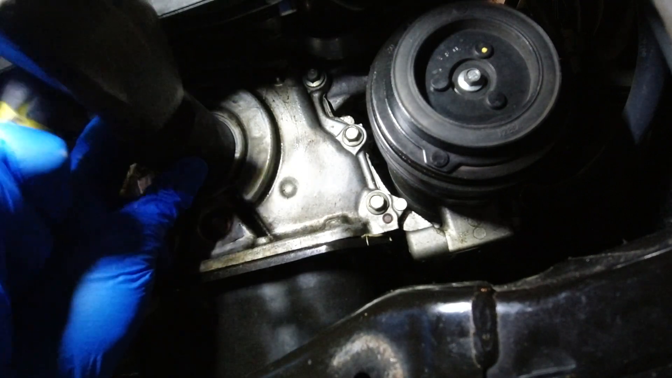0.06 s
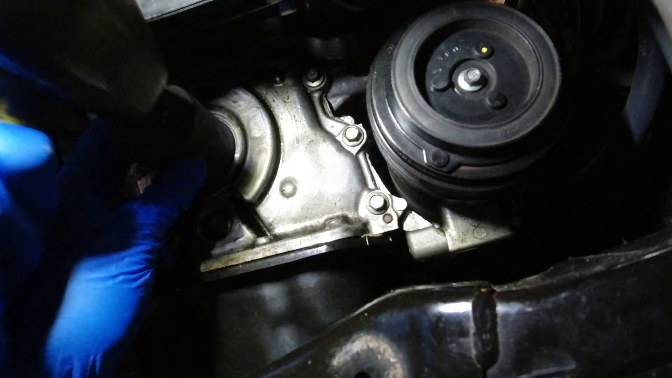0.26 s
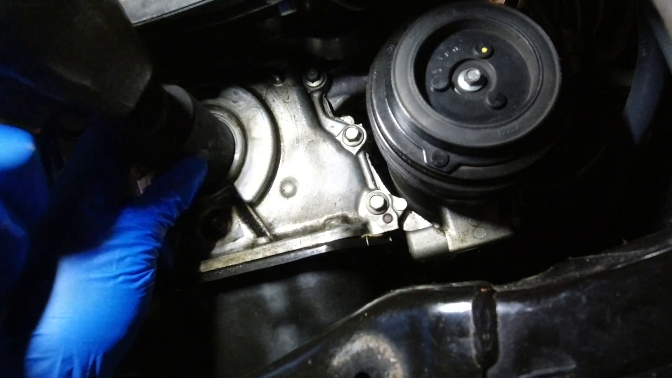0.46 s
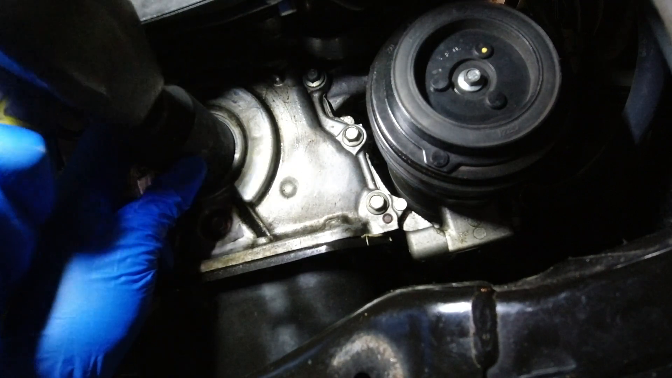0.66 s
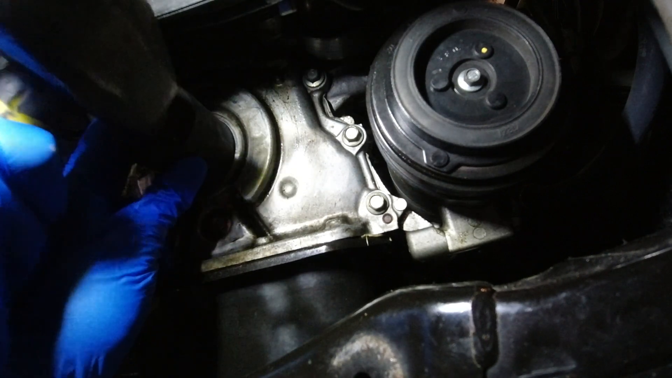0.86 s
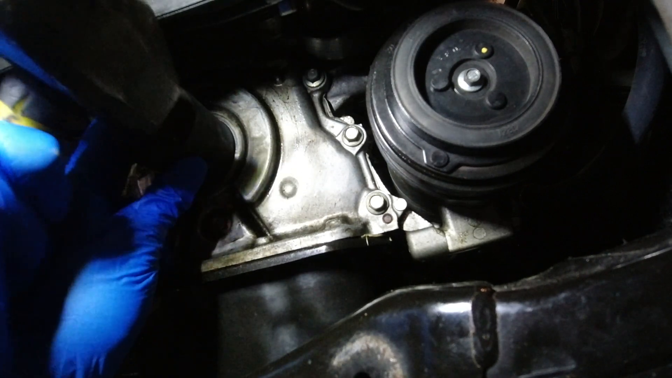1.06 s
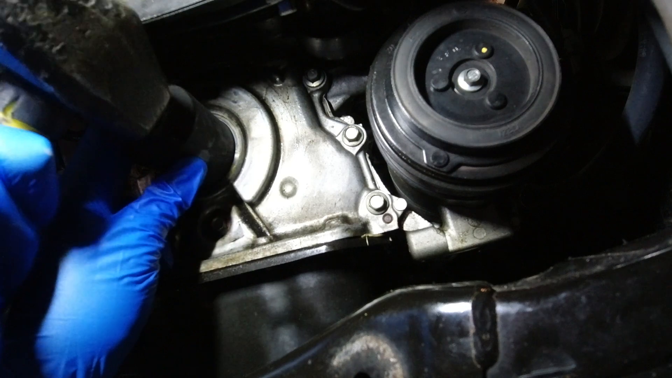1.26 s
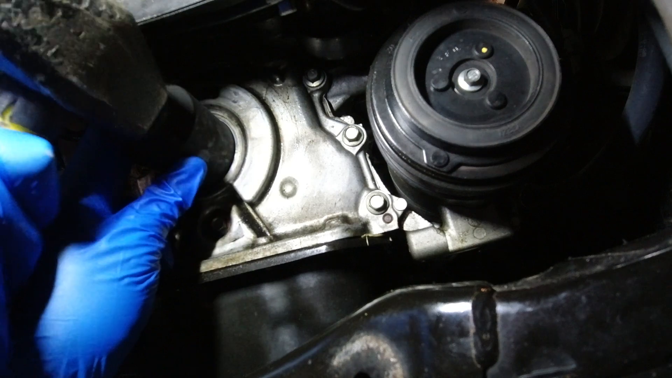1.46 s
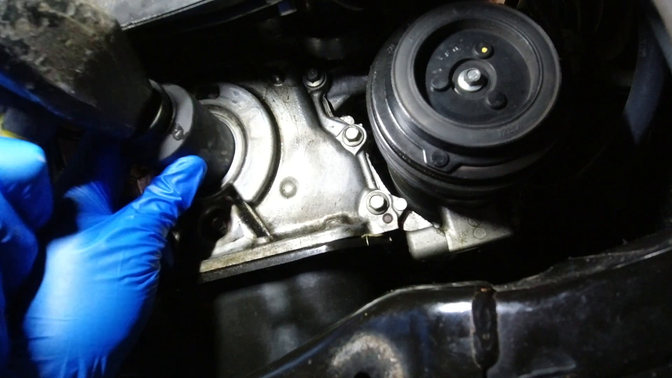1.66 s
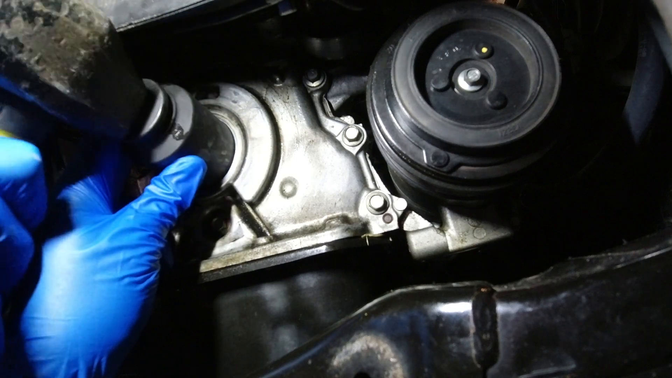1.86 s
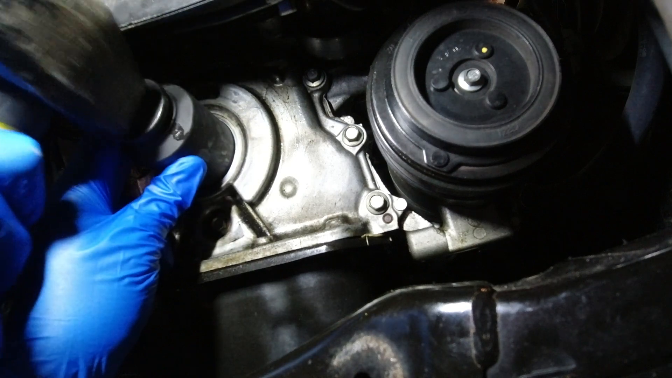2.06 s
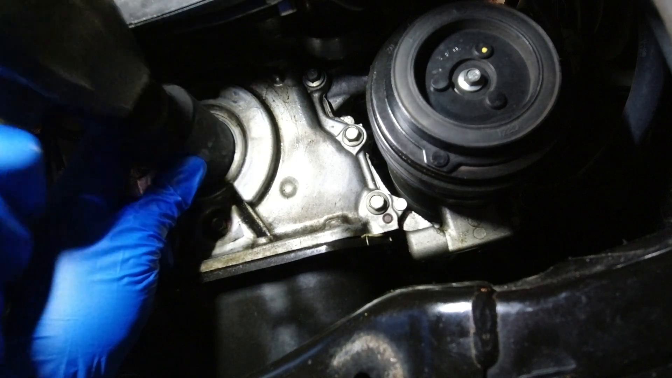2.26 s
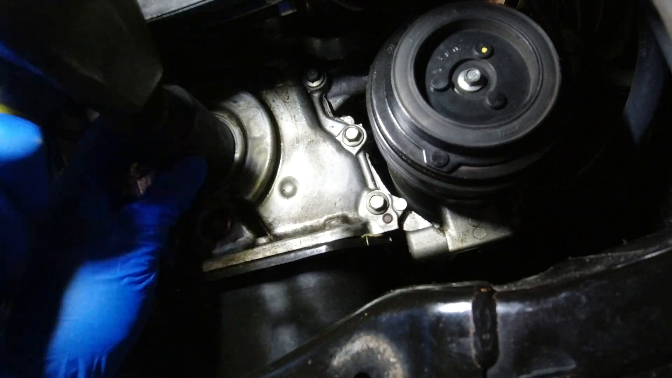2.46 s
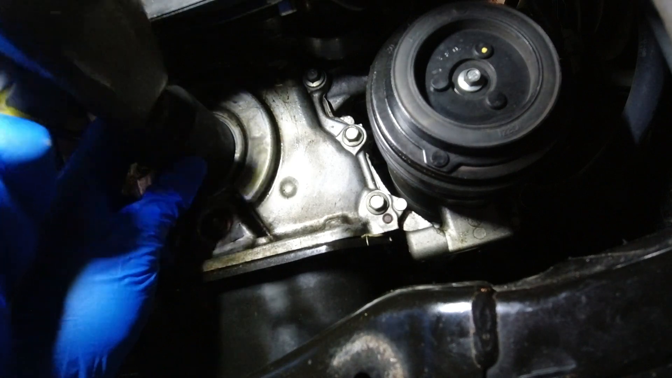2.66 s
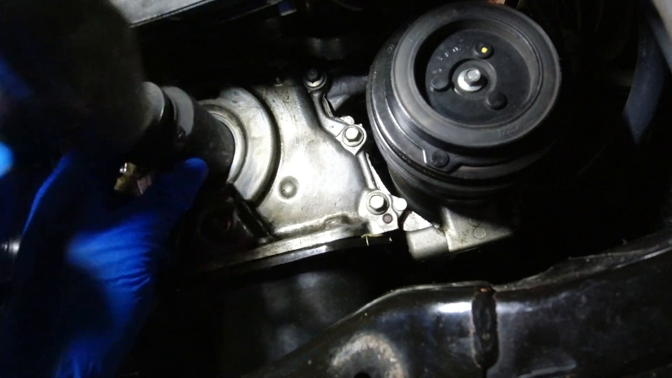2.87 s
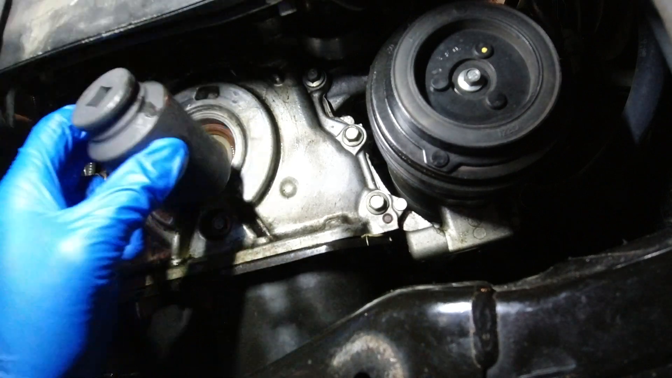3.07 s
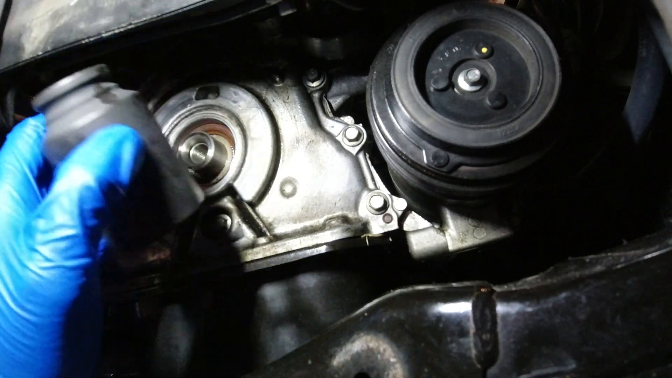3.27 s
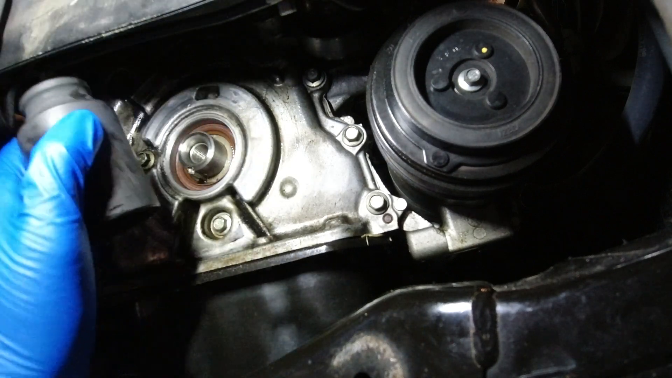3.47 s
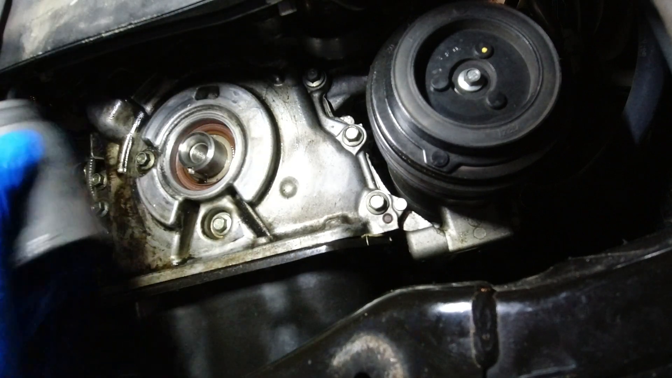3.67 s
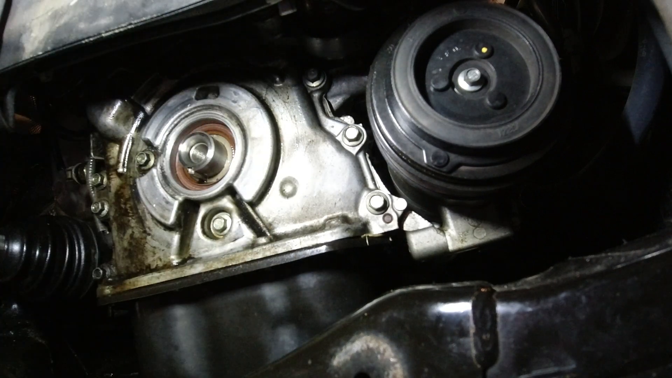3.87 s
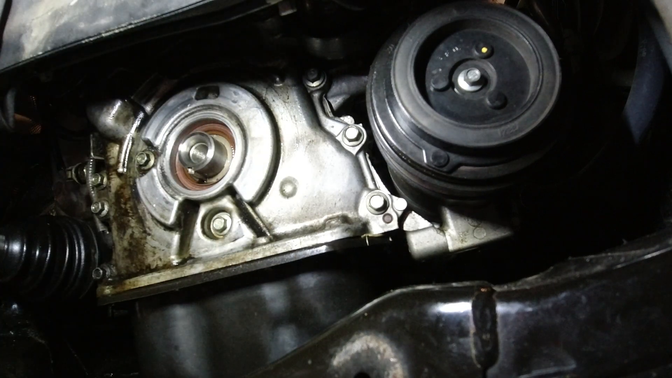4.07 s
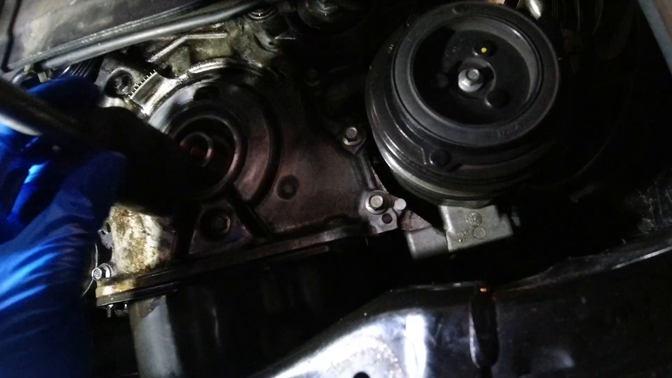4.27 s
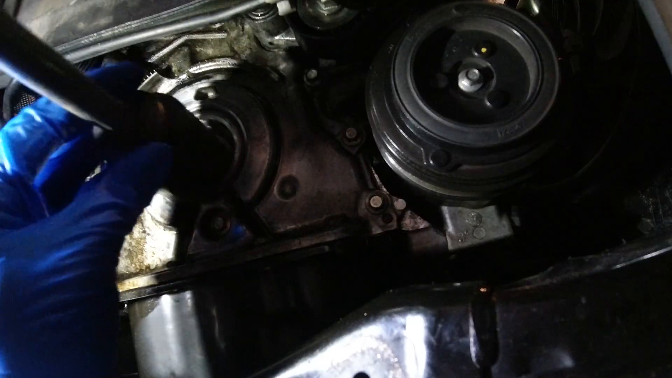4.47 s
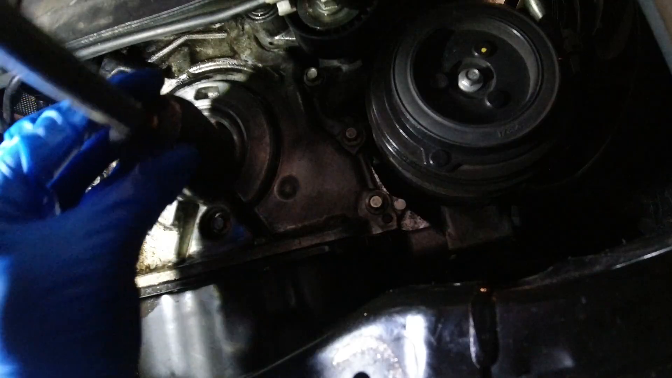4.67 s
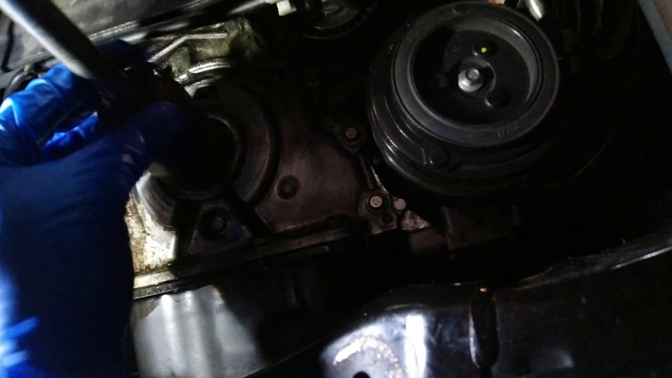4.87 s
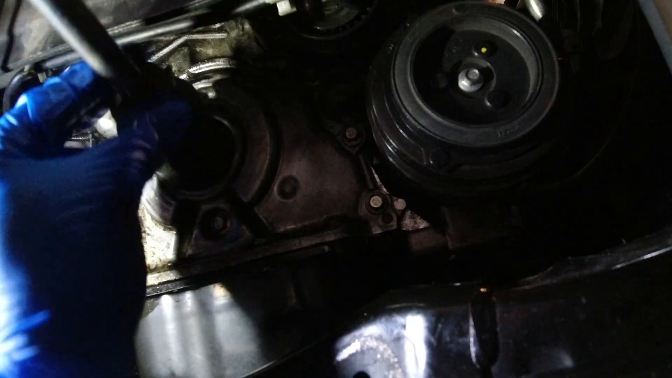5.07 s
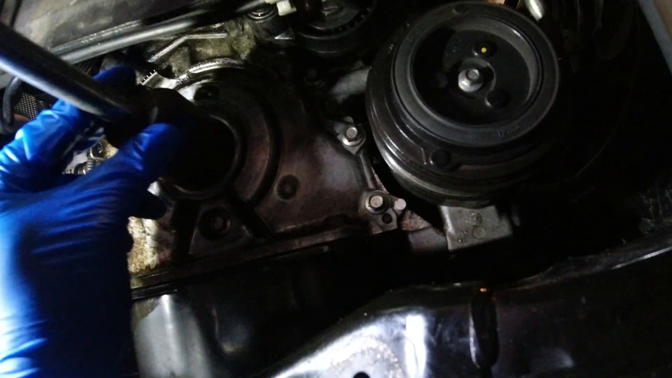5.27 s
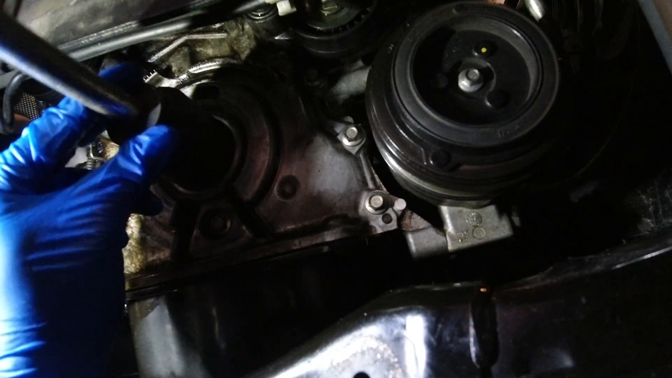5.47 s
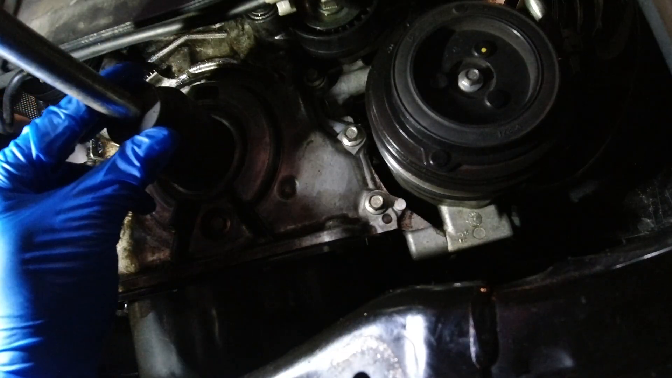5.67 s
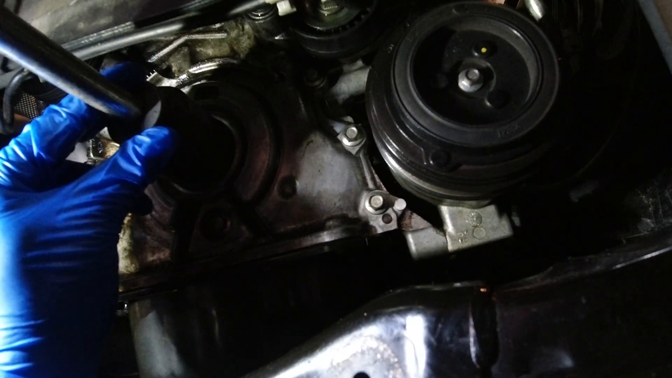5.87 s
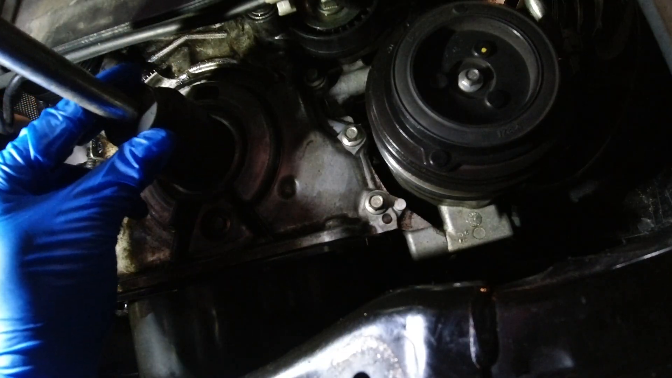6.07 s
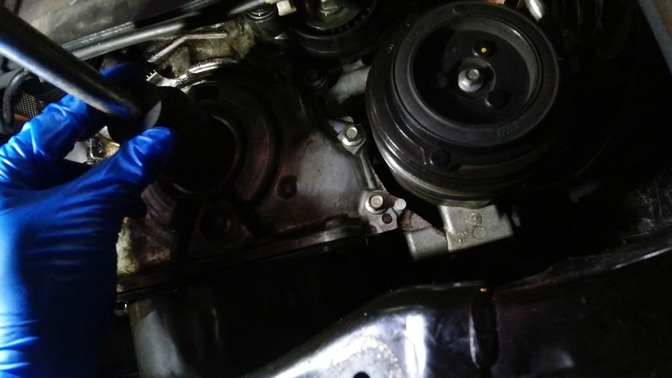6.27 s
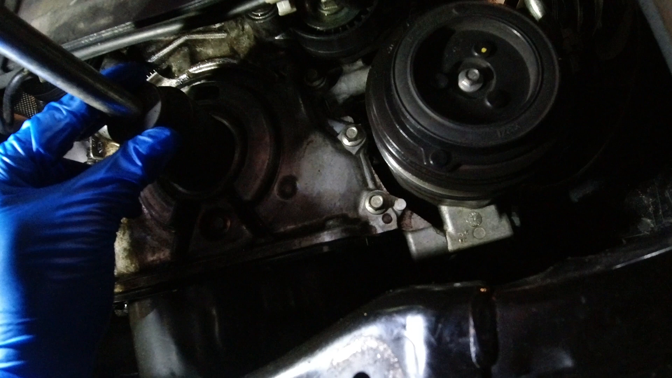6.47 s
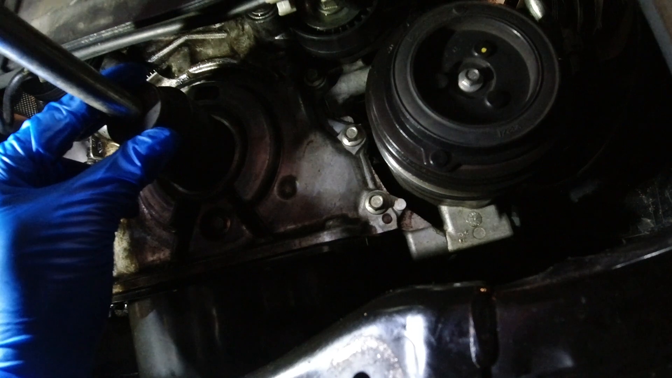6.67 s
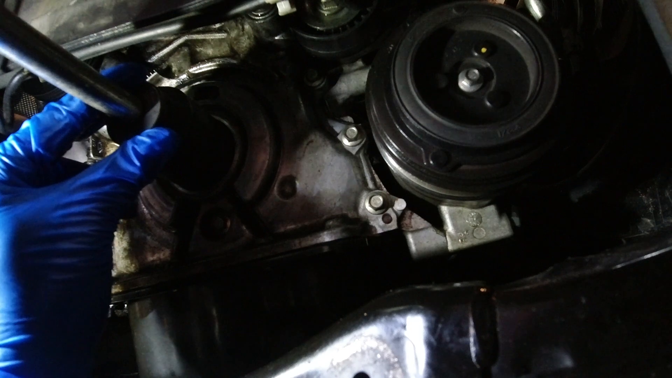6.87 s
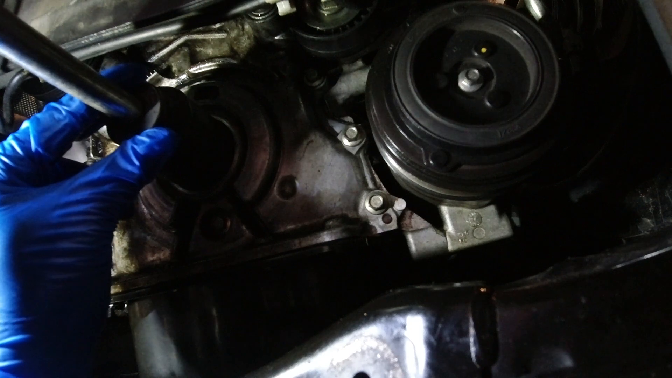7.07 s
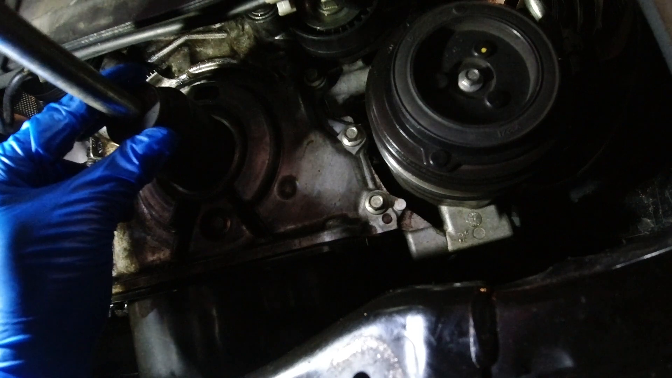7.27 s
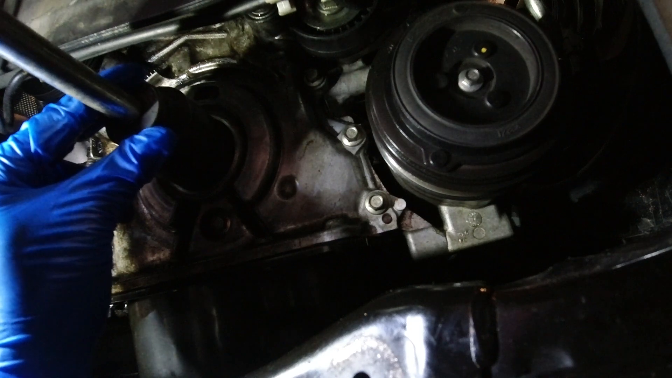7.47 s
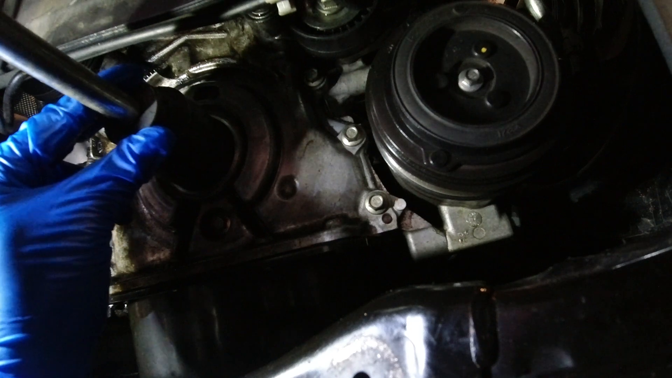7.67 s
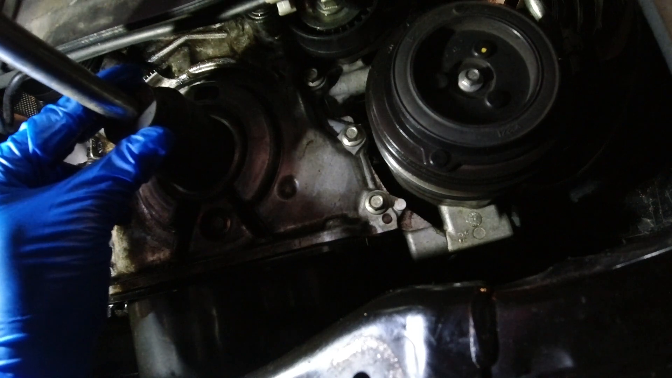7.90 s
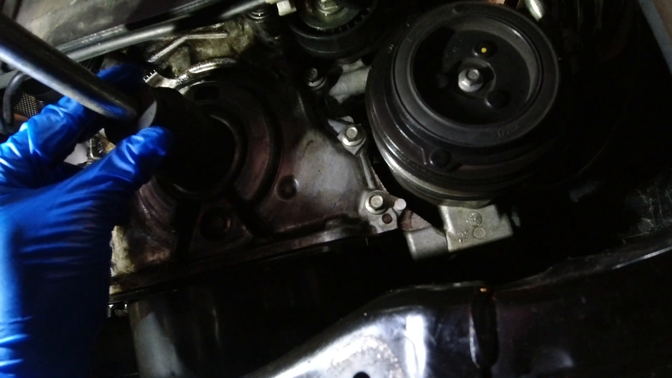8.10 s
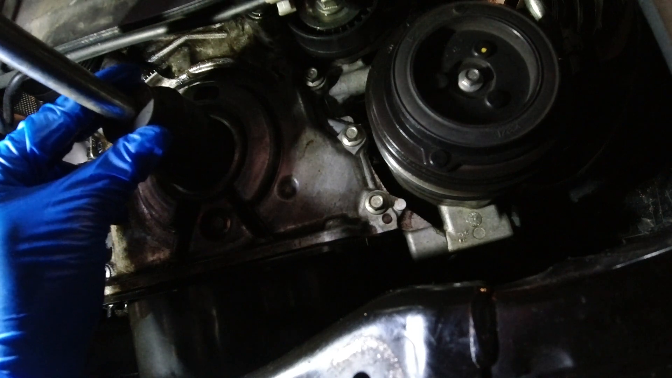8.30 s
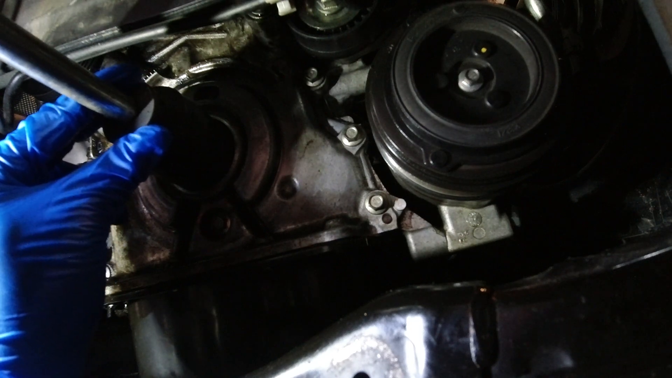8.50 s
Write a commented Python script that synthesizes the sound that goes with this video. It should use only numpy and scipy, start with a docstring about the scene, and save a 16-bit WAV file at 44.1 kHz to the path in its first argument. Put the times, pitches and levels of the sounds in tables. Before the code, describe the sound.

Quick, close mallet blows on a steel socket, a few metal clinks and knocks, then lighter ringing hammer taps over a low rumble.

```python
"""Driving a seal in a garage

Close to a camera's microphone, a shot-filled mallet beats a big socket to drive a seal into an engine
cover, the shot thudding back on each swing. The socket is lifted off, set again on a steel bar and
tapped with a hammer. Far traffic rumbles and hisses; the camera ducks briefly after very sudden clicks."""
import sys
import numpy as np
from scipy import signal
from scipy.fft import rfft, irfft, next_fast_len
from scipy.io import wavfile
from scipy.ndimage import uniform_filter1d

SR = 44100
rng = np.random.default_rng(int(sys.argv[2]) if len(sys.argv) > 2 else 0)


def file_out(sig):
    """Save sig as 16-bit WAV at sys.argv[1]."""
    # one column per channel
    cols = np.atleast_2d(sig).T
    # limit, then scale
    lim = np.clip(cols, -1, 1)
    pcm = np.round(lim * 32767).astype(np.int16)
    wavfile.write(sys.argv[1], SR, pcm)


N = 376613
SCENE_T = np.arange(N) / SR
T = np.arange(SR // 2) / SR  # time since contact
PUSH = -signal.gausspulse(T - .0012, fc=1500, bw=1.4)  # first pressure spike of a square blow
SOCKET_TOP_MODE = (13850, 0, 0.15)  # f/Hz, level/dB, t60/s

# spectrum of a mallet blow: f/Hz, level/dB
BLOW_SPECTRUM = [(35, -43), (60, -6.5), (256, 1.5), (389, -7), (803, -12), (1660, -6.5), (3340, -10),
                 (4750, -22), (6000, -28), (7570, -45.5), (12000, -60), (16000, -94.5)]
# socket resonances under the mallet: f/Hz, level/dB
SOCKET_PEAKS = [(3600, 10), (5100, 10), (5900, 10), (10900, 8)]
# colour of the rushing shot over that of a blow: f/Hz, level/dB
RUSH_TILT = [(400, 3), (2000, -5.5), (6000, -11), (11000, -4)]
# modes of the mallet head: f/Hz, level/dB, t60/s
HEAD_MODES = [(423.6, 2.5, 0.2), (586.5, 3.5, 0.13), (740.6, 2.5, 0.19), (1025, 5.5, 0.095),
              (1500, 4.5, 0.11), (2166, 9, 0.074)]
# blows: t/s, level/dB, lead of the shot/s, its rush/dB, treble/dB, two loudest rings f/Hz, f/Hz
BLOW_HITS = [(0.145, -4, 0.022, -23.5, -3, 2360, 3774), (0.374, -5.5, 0.014, -24.5, -1, 1606, 3720),
             (0.6083, -5, 0.018, -26.5, 1.5, 2445, 3270), (0.82, -5.5, 0.021, -29.5, -3, 1757, 2890),
             (1.042, -5.5, 0.026, -22, -8.5, 1660, 2830), (1.269, -5, 0.026, -24.5, -1.5, 2470, 3340),
             (1.489, -9, 0.027, -37, -2, 2120, 2780), (1.7196, -7.5, 0.03, -21.5, -6.5, 2490, 3614),
             (1.9258, -7.5, 0.014, -25, -12.5, 1657, 3640), (2.1501, -5.5, 0.027, -20.5, -9.5, 935, 1664),
             (2.377, -2.5, 0.018, -20.5, -1.5, 2420, 3370), (2.614, -6, 0.018, -29.5, -1, 1748, 3260),
             (2.797, -5.5, .021, -23.5, -1.5, 1606, 3010)]
def mallet_blows():
    """The mallet beats the socket close to the microphone, each blow led by the shot rushing forward."""
    x = np.zeros(N)
    for s, db, lead, rush_db, treble_db, *ring_hz in BLOW_HITS:
        tilt = [(300, -9.5), (2000, 0.0047), (8000, treble_db)]
        blow = strike(BLOW_SPECTRUM, tilt, COVER_MODES, rise=0.0018, crack_t60=0.018, body_db=-17,
                      body_t60=0.072, modes_db=-28, room_db=-35, peaks=SOCKET_PEAKS)
        add(x, s - .002, amp(db) * blow)
        add(x, s - .001, amp(db - 13) * clang(ring_hz, t60=.055))
        add(x, s, amp(db - 4.5) * PUSH)
        add(x, s, amp(db + 2 * treble_db - 65) * ring([SOCKET_TOP_MODE], scatter_db=0, detune=0.00092))
        shot = strike(BLOW_SPECTRUM, RUSH_TILT, HEAD_MODES, rise=0.0088, crack_t60=0.082, body_db=-19,
                      body_t60=0.033, modes_db=-14.5, room_db=-40)
        add(x, s - lead, amp(rush_db) * shot)
    return x


# spectrum of the landing shot: f/Hz, level/dB
THUD_SPECTRUM = [(47, -11), (80, -2), (444, 0.5), (1500, -11.5), (5140, -41.5), (8000, -78), (10400, -120)]
# shot landing in the mallet head: t/s, level/dB, rise/s
SHOT_LANDINGS = [(0.08, -25, 0.0025), (0.278, -32, 0.00092), (0.335, -31, 0.031), (0.538, -22.5, 0.0013),
                 (0.568, -25, .023), (0.747, -26, 0.0051), (0.782, -23, 0.005), (0.956, -32, .0016),
                 (1.18, -31, 0.0056), (1.399, -27.5, 0.023), (1.462, -22.5, 0.0097), (1.605, -27, 0.036),
                 (1.821, -31, 0.025), (2.053, -31, 0.028), (2.282, -20.5, .005), (2.504, -26, 0.0021),
                 (2.586, -22.5, 0.016), (2.713, -32, 0.0029)]
def shot_thuds():
    """On the swings the shot lands dully inside the mallet head and rattles on."""
    x = np.zeros(N)
    for s, db, rise in SHOT_LANDINGS:
        tilt = [(1000, 0.0081), (8000, 1.5 * (db + 28))]  # harder landings are brighter
        t60 = 0.075 + 5 * rise  # shot that pours in slowly also lasts longer
        thud = strike(THUD_SPECTRUM, tilt, HEAD_MODES, rise=rise, crack_t60=t60, body_db=-9,
                      body_t60=t60 + .2, modes_db=-17, room_db=-23)
        add(x, s - .001, amp(db) * thud)
    return x


SEATING_S = 0.27  # the loose seal gives under the first taps, then seats
LOOSE_TAP, SEATED_TAP = (17.4, -30, 3), (7.5, 6.5, -8.5)  # bass/dB, treble/dB, thump/dB
# spectrum of a hammer tap: f/Hz, level/dB
TAP_SPECTRUM = [(24, -38), (40, 4.5), (257, -1.5), (815, -4.5), (2790, 4), (3250, 4.5), (3770, -1),
                (5100, -3.5), (6080, -6.5), (7620, -20), (11100, -25), (16200, -42)]
# taps: t/s, level/dB, socket ring f/Hz, ring over tap/dB, second ring f/Hz, top treble/dB, shimmer/dB
TAP_HITS = [(6.3744, -27.5, 1640, -1.5, 2640, -18, -84), (6.59, -26, 3250, -6, 1610, 11.5, -64),
            (6.8007, -26, 3250, -3, 1720, 5, -58.5), (7.0375, -23, 3380, -8.5, 2320, 4.5, -50),
            (7.2885, -22, 2280, -9.5, 3385, -24, -59), (7.5726, -21.5, 2665, -7.5, 2546, -8.5, -56),
            (7.867, -19.5, 2700, -18.5, 1597, 0.5, -58), (8.162, -23.5, 2710, -10, 4560, 1, -57),
            (8.4316, -19, 3280, -14, 1650, 10, -52)]
def hammer_taps():
    """Steel on the bar end: the engine thumps, the socket rings, taps brighten as the seal seats."""
    x = np.zeros(N)
    thump = -np.sin(2 * np.pi * 65 * T) * decay(0.12)
    ring_fade = (decay(0.078) + amp(-18.5) * decay(0.38)) * onset(0.00088)  # drops fast, then hangs on
    for s, db, ring_hz, ring_db, second_hz, top_db, shimmer_db in TAP_HITS:
        loose = np.exp(-(s - TAP_HITS[0][0]) / SEATING_S)
        bass_db, treble_db, thump_db = loose * np.array(LOOSE_TAP) + (1 - loose) * np.array(SEATED_TAP)
        tilt = [(300, bass_db), (2000, 0), (6900, 0.005), (9000, treble_db), (14000, treble_db + top_db)]
        tap = strike(TAP_SPECTRUM, tilt, COVER_MODES, rise=0.00075, crack_t60=0.029, body_db=-6,
                     body_t60=0.078, modes_db=-np.inf, room_db=-22.5,
                     peaks=[(second_hz, 6), (11000, 6.5)])
        add(x, s - .0005, amp(db) * tap)
        add(x, s, amp(db - 13) * clang([ring_hz, second_hz], t60=.045))
        rough_ring = filtered(rng.standard_normal(len(T)), lambda f: resonance(f, ring_hz, width_hz=150))
        add(x, s, amp(db + ring_db) * ring_fade * unit(rough_ring))
        add(x, s, amp(shimmer_db) * steel_shimmer())
        add(x, s, amp(shimmer_db - 18) * ring([SOCKET_TOP_MODE], scatter_db=4, detune=.002))
        add(x, s, amp(db + 5) * PUSH)
        add(x, s, amp(db + thump_db) * thump)
    return x


# bands of close-packed steel modes: f/Hz, level/dB
STEEL_BANDS = [(4400, 6), (5250, 8), (5870, 5), (6600, 3), (9100, 0), (10300, 1), (11100, 3), (12000, -5),
               (13200, -11)]
def steel_shimmer():
    """High steel modes die away under the hammer, shifted and reweighted for each tap."""
    bands = [(hz * rng.normal(1, .015), db + rng.normal(0, 4)) for hz, db in STEEL_BANDS]
    response = lambda f: sum(amp(db) * resonance(f, hz, width_hz=670) for hz, db in bands)
    return unit(filtered(rng.standard_normal(len(T)), response)) * decay(0.19) * onset(0.0035)


# spectrum of a light metal contact: f/Hz, level/dB
CLINK_SPECTRUM = [(88, -62), (150, -16.5), (514, -2), (820, 11), (1700, 4.5), (2350, 0), (3720, -4),
                  (4320, -14), (5930, -26), (7150, -44.5), (13000, -82)]
# contacts: t/s, level/dB, low and middle weight/dB, t60/s, two loudest rings f/Hz, f/Hz
CLINK_HITS = [(2.923, -41, -12, 0.041, 1354, 2930), (3.022, -40, -8, 0.15, 1670, 2210),
              (3.884, -35.5, -17, 0.075, 2240, 3520), (4.193, -27, 0, 0.036, 590, 1950),
              (4.885, -28, 2, 0.31, 977, 1630), (4.956, -10, -2.5, 0.062, 785, 2996),
              (5.093, -19, 2, 0.14, 743, 1597), (5.186, -32.5, 5, 0.15, 730, 1626),
              (5.225, -35, -21, 0.051, 2570, 2350), (5.26, -39, -14, 0.033, 3640, 1630),
              (5.509, -18, -11.5, 0.097, 1160, 2900), (5.987, -19.5, -25, 0.038, 2480, 4410)]
def socket_clinks():
    """Socket and bar knock lightly on the engine as they are moved."""
    x = np.zeros(N)
    for s, db, weight_db, t60, *ring_hz in CLINK_HITS:
        tilt = [(300, 8.5 + 2.8 * weight_db), (900, weight_db), (3000, 0.00052), (8000, 3)]
        clink = strike(CLINK_SPECTRUM, tilt, COVER_MODES, rise=t60 / 35, crack_t60=t60 / 3, body_db=-7,
                       body_t60=t60, modes_db=-34, room_db=-27, peaks=[(hz, 6) for hz in ring_hz])
        add(x, s - .001, amp(db) * clink)
        add(x, s, amp(db + weight_db / 2 - 5) * clang(ring_hz, t60=.065))
    return x


# modes of the engine cover: f/Hz, level/dB, t60/s
COVER_MODES = [(215, -8.5, 0.34), (389.8, 5.5, 0.24), (433, 0, 0.17), (579, 3, 0.18), (751, 2.5, 0.19),
               (934, 10, 0.11), (1174, 7, 0.13), (1470, 2, 0.097), (1668, 11.5, 0.045), (2044, -3, 0.085),
               (2516, 5.5, 0.053)]
# reverberation of the garage: f/Hz, t60/s
GARAGE_DECAY = [(100, 0.54), (500, 0.86), (2500, 0.33), (6000, 0.25), (10000, 0.13), (15000, 0.11)]
def strike(spectrum, tilt, modes, rise, crack_t60, body_db, body_t60, modes_db, room_db, peaks=()):
    """One close contact: a crack, a rattling body, the modes of what is struck and the garage's tail."""
    noise = rng.standard_normal((3, len(T)))
    crack = noise[0] * decay(crack_t60)
    body = noise[1] * amp(body_db) * decay(body_t60)
    hz, t, bins = signal.stft(noise[2], SR, nperseg=256)
    room_fade = amp(room_db - 60 * t / along(GARAGE_DECAY, hz)[:, None])
    tail = signal.istft(bins * room_fade, SR, nperseg=256)[1][:len(T)]
    # what lingers gathers round the metal's resonances, at new strengths each time
    peaks = [(c, db + rng.normal(0, 2.5)) for c, db in peaks]
    metal = lambda f: 1 + sum(amp(db) * resonance(f, c, width_hz=.06 * c) for c, db in peaks)
    chatter = .8 + .55 * unit(uniform_filter1d(noise[0], size=350))  # loose contact roughens the ring
    ringing = amp(modes_db) * chatter * ring(modes, scatter_db=3, detune=.008)
    contact = (crack + filtered(body + tail, metal) + ringing) * (1 - np.exp(-T / rise))
    coloured = filtered(contact, lambda f: amp(along(spectrum, f) + along(tilt, f)))
    spectrum_rms = np.sqrt(np.mean(amp(2 * along(spectrum, np.linspace(0, SR / 2, num=500)))))
    return coloured * onset(0.0013) / spectrum_rms


def ring(modes, scatter_db, detune):
    """Decaying modes, their strength, phase and pitch drawn anew for each contact."""
    x = np.zeros(len(T))
    for hz, db, t60 in modes:
        fade = amp(db + rng.normal(0, scatter_db)) * decay(t60)
        x += fade * np.sin(2 * np.pi * (hz * rng.normal(1, detune) * T + rng.random()))
    return x * (1 - np.exp(-T / 0.0021))


def clang(ring_hz, t60):
    """The few rings that stand out of one contact."""
    return ring([(hz, 0, t60) for hz in ring_hz], scatter_db=1.5, detune=.003)


DAMPED_T60 = 0.039
# the two modes of the free steel bar: f/Hz, level/dB, t60/s
BAR_MODES = [(5820, 0, .32), (14550, -26, .3)]
# contacts that ring the bar: t/s, level/dB, free time/s, upper mode over lower/dB
BAR_HITS = [(3.05, -66, 0.14, -30), (4.51, -60, 0.045, -24), (4.886, -44.5, 0.052, -30),
            (4.972, -71, 0.13, -6), (5.093, -50, 0.11, -20), (5.185, -55, 0.055, -17),
            (5.26, -67.5, 0.034, -32)]
def bar_pings():
    """The knocked bar rings freely for a moment, then is damped."""
    x = np.zeros(N)
    lower_mode, (upper_hz, _, upper_t60) = BAR_MODES
    for s, db, free_s, upper_db in BAR_HITS:
        ping = ring([lower_mode, (upper_hz, upper_db, upper_t60)], scatter_db=1.5, detune=0)
        damping_db = 60 * np.maximum(T - free_s, 0) / DAMPED_T60
        add(x, s, amp(db - damping_db) * ping)
    return x


# spectrum of the sliding socket: f/Hz, level/dB
SCRAPE_SPECTRUM = [(600, -56), (1200, 5), (1670, 7.5), (2300, 8), (3200, -2.5), (4500, -28), (6300, -16.5),
                   (7500, -51)]
# slides: loudest t/s, level/dB, rise/s, fall/s
SLIDES = [(3.045, -38, 0.025, 0.035), (4.93, -43, 0.063, 0.037)]
def socket_scrapes():
    """The socket scrapes briefly as it slides."""
    return swells(SLIDES) * patchy_noise(SCRAPE_SPECTRUM, patchy_db=-6)


# spectrum of gloves on tools: f/Hz, level/dB
GLOVE_SPECTRUM = [(1200, -64), (2200, -3), (3600, 0.5), (5500, -14), (7500, -30), (12600, -34),
                  (14000, -49)]
# swells of rustle: loudest t/s, level/dB, rise/s, fall/s
GLOVE_SWELLS = [(4.5, -64, 0.4, 0.2), (4.63, -58, 0.044, 0.071), (6.0, -67.5, .25, 0.087)]
# the bar singing: loudest t/s, level/dB, rise/s, fall/s
BAR_SWELLS = [(4.8, -66, 0.17, 0.19)]
def tool_handling():
    """Near the microphone gloves rustle and the handled bar sings faintly and unevenly."""
    handling = (SCENE_T > 2.95) & (SCENE_T < 5.7)
    rustle_gain = amp(-83.5) * handling + swells(GLOVE_SWELLS)
    rustle = rustle_gain * patchy_noise(GLOVE_SPECTRUM, patchy_db=4.5)
    singing = filtered(rng.standard_normal(N), lambda f: 1 / (10 + 1j * (f - BAR_MODES[0][0])))
    return rustle + swells(BAR_SWELLS) * unit(singing)


def cut_click():
    """The faint click of an edit cut in the sound."""
    return amp(-40) * signal.unit_impulse(N, round(4.3025 * SR))


# spectra of the background throb, rumble and hiss: f/Hz, level/dB
THROB_SPECTRUM = [(8, 4.5), (22, 22), (45, 1.5), (70, -58), (200, -130)]
RUMBLE_SPECTRUM = [(24, -31.5), (40, -3.5), (118, -0.5), (183, -15), (263, -16), (450, -31.5), (580, -56.5),
                   (990, -120)]
HISS_SPECTRUM = [(180, -47.5), (300, -6.5), (519, -2), (1030, 2.5), (1660, -11), (1840, -20), (2700, -25.5),
                 (3640, -32), (7080, -59), (12700, -64), (16000, -65.5)]
# background level, which jumps at a cut near 4.3 s: t/s, throb level/dB, rumble and hiss level/dB
BACKGROUND_LEVELS = [(0, -44, -49.5), (2.75, -48, -52), (2.95, -47.5, -57), (3.4, -62, -58),
                     (4.17, -73, -55), (4.27, -36.5, -49), (4.33, -57.5, -45.5), (6.3, -54, -48.5),
                     (6.5, -46, -48), (7.2, -45.5, -55.5), (8.54, -48.5, -57.5)]
def background():
    """A deep throb, a rumble and a mid hiss reach the garage from far outside."""
    times, *levels = np.transpose(BACKGROUND_LEVELS)
    throb_db, level_db = [np.interp(SCENE_T, times, db) for db in levels]
    throb = patchy_noise(THROB_SPECTRUM, patchy_db=3)
    rumble = patchy_noise(RUMBLE_SPECTRUM, patchy_db=1.5)
    hiss = amp(0.65) * patchy_noise(HISS_SPECTRUM, patchy_db=1.2)
    return amp(throb_db) * throb + amp(level_db) * (rumble + hiss)


def patchy_noise(spectrum, patchy_db):
    """Noise of rms 1 with patches of random gain in time and frequency."""
    bins = signal.stft(rng.standard_normal(N), nperseg=512)[2]
    patches = uniform_filter1d(rng.standard_normal(bins.shape), size=5, axis=0)
    patches = uniform_filter1d(patches, size=12, axis=1)
    x = signal.istft(bins * amp(patchy_db * unit(patches)), nperseg=512)[1][:N]
    return unit(filtered(x, lambda hz: amp(along(spectrum, hz))))


def swells(rows):
    """Gains that grow and fade by 20 dB over each row's rise and fall time."""
    return sum(amp(db - 20 * np.maximum((s - SCENE_T) / rise, (SCENE_T - s) / fall))
               for s, db, rise, fall in rows)


def amp(db):
    return 10 ** (np.asarray(db) / 20)


def unit(x):
    return x / np.sqrt(np.mean(x ** 2) + 1e-20)


def decay(t60):
    return amp(-60 * T / t60)


def onset(rise_s):
    return np.clip(T / rise_s, 0, 1)


def resonance(f, centre_hz, width_hz):
    return 1 / (1 + (2 * (f - centre_hz) / width_hz) ** 2)


def along(points, hz):
    """Interpolate (f/Hz, value) points on a log axis."""
    f, values = np.transpose(points)
    return np.interp(np.log(hz + 1), np.log(f + 1), values)


def filtered(x, response):
    """x through a frequency response."""
    size = next_fast_len(x.shape[-1] + 4096)
    return irfft(rfft(x, size) * response(np.fft.rfftfreq(size, 1 / SR)), size)[..., :x.shape[-1]]


def add(track, s, sound):
    """Lay a sound on the track from time s."""
    part = track[round(s * SR):][:len(sound)]
    part += sound[:len(part)]


def scene():
    """Close tools over far traffic, at one microphone in the garage."""
    mallet = mallet_blows() + shot_thuds()
    resetting = socket_clinks() + bar_pings() + socket_scrapes()
    return (mallet + resetting + hammer_taps() + tool_handling() + cut_click() + background())[None]


DUCK_DB, DUCK_DELAY_S, TOP_HZ = -26, .007, 16300
def record(dry):
    """The camera's click guard ducks just after a very sudden bright rise; nothing passes above TOP_HZ."""
    treble = np.diff(dry[0], prepend=0)
    energy = np.cumsum(np.pad(treble ** 2, (1200, 0)))
    power_now = (energy[1200:] - energy[1040:-160]) / 160
    power_before = (energy[1040:-160] - energy[:-1200]) / 1040
    rise_db = 10 * np.log10((power_now + 1e-9) / (power_before + 3e-7))
    duck = uniform_filter1d(np.clip((rise_db - 23) / 4, 0, 1), size=110)
    late_duck = np.interp(SCENE_T - DUCK_DELAY_S, SCENE_T, duck)
    return filtered(dry * amp(DUCK_DB * late_duck), lambda hz: hz < TOP_HZ)


dry = scene()
out = record(dry)
file_out(out)
```